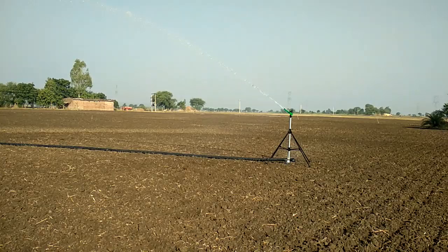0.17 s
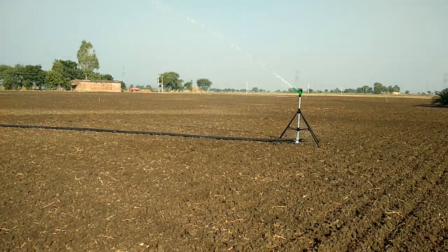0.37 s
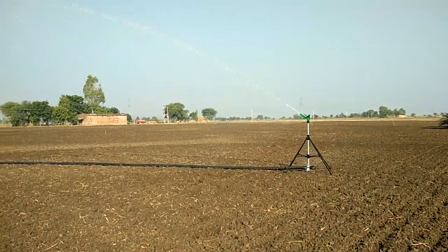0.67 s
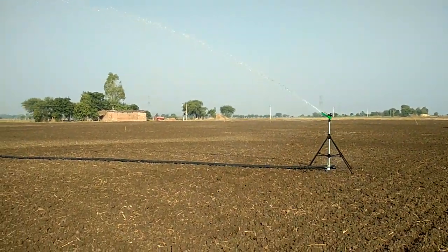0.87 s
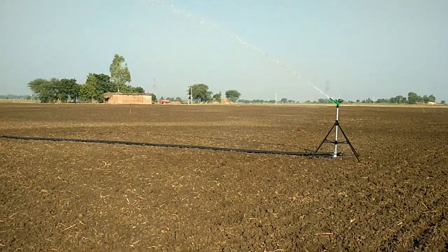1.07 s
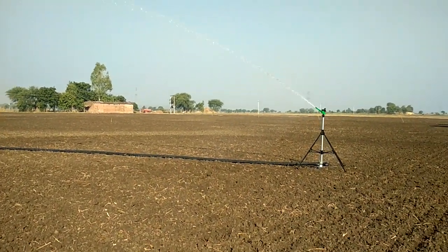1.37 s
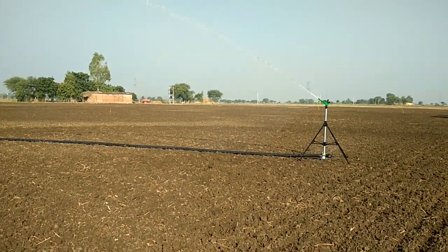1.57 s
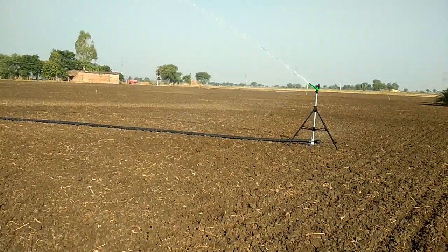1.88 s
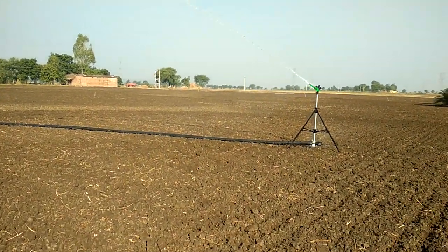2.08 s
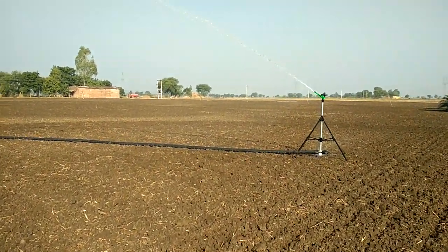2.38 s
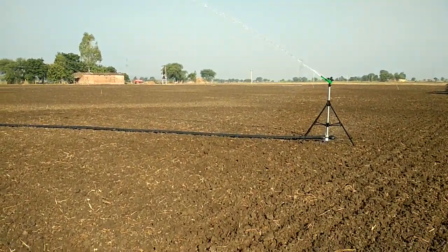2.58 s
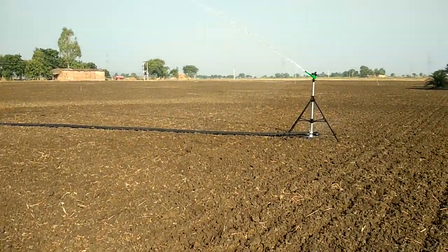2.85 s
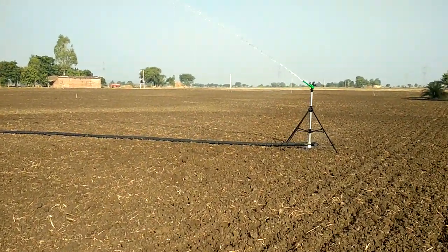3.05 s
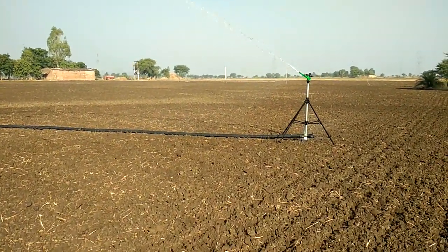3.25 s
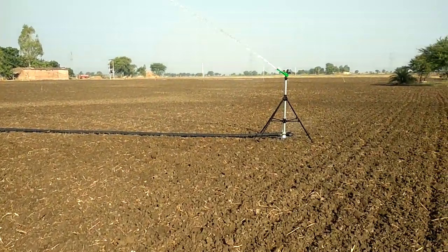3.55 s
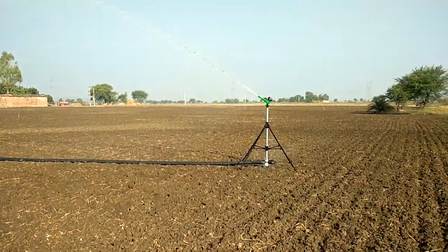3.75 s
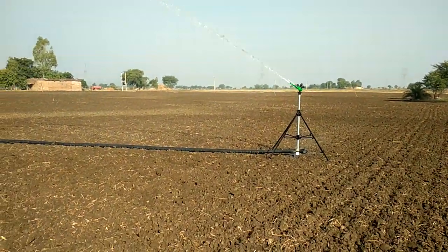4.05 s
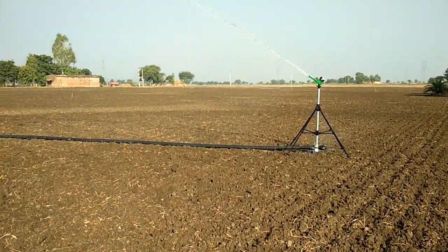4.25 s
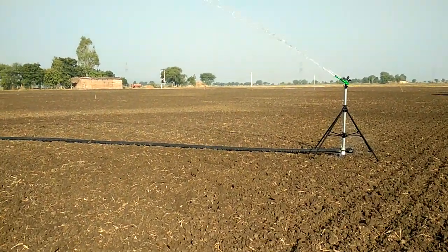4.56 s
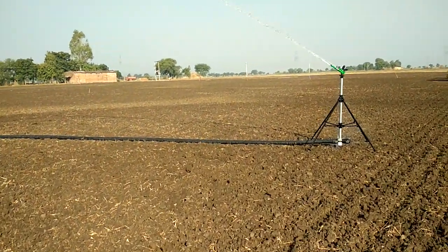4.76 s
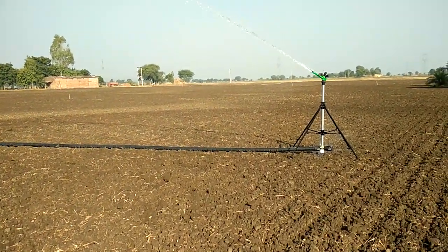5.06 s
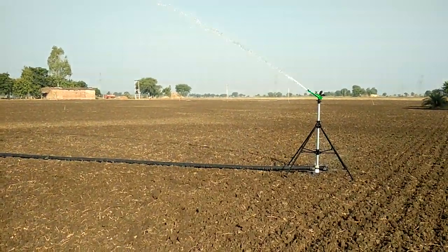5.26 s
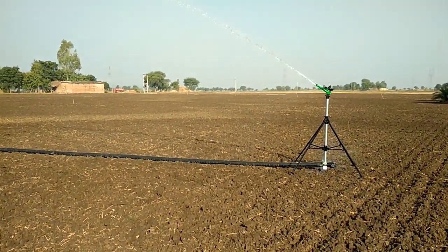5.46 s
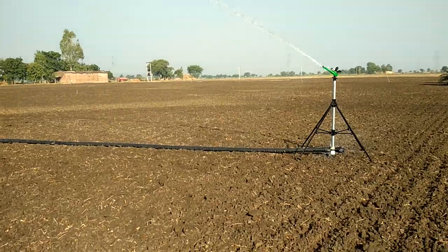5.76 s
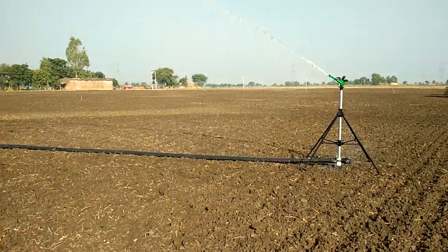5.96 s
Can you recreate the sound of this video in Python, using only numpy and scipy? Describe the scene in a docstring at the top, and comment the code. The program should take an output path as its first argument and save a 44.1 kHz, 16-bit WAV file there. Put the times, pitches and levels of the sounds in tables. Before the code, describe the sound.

An impact sprinkler clicks evenly, four times a second, a few metres off in an open field. Each stroke is a short metallic slap with a sharp, bright spurt of spray, mostly toward the right. A thin jet hiss continues beneath. Low wind rumble buffets the handheld phone microphone, strongest on the right and busier from three seconds on, with a pop near 3.8 seconds. Occasional dull footsteps scuff loose soil. No echo.

```python
"""An impact sprinkler on a tripod waters a ploughed field, some metres to the right of a hand-held phone.
About four times a second its spoon meets the jet, mostly with a ringing slap, and tears out bursts of spray.
The jet is a steady hiss of flickering noise bands, with a few short spits.
Wind noise buffets the two microphone ports, now and then with a pop; filtered grains make feet in loose soil.
A faint rumble of open country lies underneath."""
import sys
import numpy as np
from scipy import signal
from scipy.fft import rfft, irfft, next_fast_len
from scipy.io import wavfile
from scipy.ndimage import uniform_filter1d

SR = 44100
rng = np.random.default_rng(int(sys.argv[2]) if len(sys.argv) > 2 else 0)


def inscribe(sig):
    """Save sig as 16-bit PCM at rate SR to the path in sys.argv[1].

    A 1-D sig is mono; a 2-D sig holds one channel per row.
    Samples are clipped to [-1, 1] before scaling.
    """
    pcm = np.round(np.clip(np.atleast_2d(sig).T, -1, 1) * 32767)
    wavfile.write(sys.argv[1], SR, pcm.astype(np.int16))


N = 270333
TIME = np.arange(N) / SR  # seconds

# Strokes of the swing arm, and a second splash at 5.372. Each row: start in seconds, time in the jet in seconds,
# shredded water in dB, tint of the finest drops in dB, left minus right of the water in dB.
STROKES = [(.133, 0.016, -44.5, -9, -14), (0.384, 0.012, -47, -14, -18), (.631, 0.014, -53, 0, -8),
           (.88, 0.016, -47, -4, -5), (1.127, 0.016, -40, 6, -13), (1.375, 0.016, -37.5, 4, -15),
           (1.624, 0.015, -50.5, -2, -5), (1.869, 0.02, -52, -2, -3.5), (2.117, 0.017, -42, -16, -11),
           (2.364, 0.014, -47, -9, -11), (2.61, 0.01, -47.5, -9, -6.5), (2.857, 0.016, -38.5, 1.5, -10.5),
           (3.11, .014, -42.5, 3, -5.5), (3.354, 0.013, -38.5, 9.5, -11), (3.599, 0.015, -38, 6.5, -10.5),
           (3.848, 0.018, -41, 1.5, -14.5), (4.098, 0.013, -39, 5.5, -4.5),
           (4.344, 0.022, -36.5, 3.5, -8.5), (4.595, 0.0079, -36, -2.5, -12),
           (4.839, 0.013, -35.5, 1.5, -15), (5.083, 0.025, -39, 5, -11), (5.332, 0.02, -39, 2.5, -16),
           (5.372, 0.023, -39.5, 9, -30), (5.573, 0.02, -35.5, 5.5, -14.5), (5.818, 0.022, -42, 5, -2.5),
           (6.068, 0.012, -42, 14, -3.5)]
# Ringing modes of the spoon. Each row: nominal pitch in Hz, time to fade by 60 dB in seconds, relative level in dB.
SPOON_MODES = [(390, 0.062, -18.5), (783, 0.055, -10.5), (1213, 0.022, -1.5), (1298, 0.032, 5.5),
               (1410, 0.038, -5.5), (1596, 0.0095, 0.5), (1950, 0.01, -4), (2290, 0.025, -0.5),
               (3346, 0.015, -3.5)]
# Basic colour of shredded water. Each row: frequency in Hz, relative level in dB.
SPRAY_COLOUR = [(300, -37), (700, -20.5), (1400, -17), (2400, -13), (3400, -11), (4100, -11), (4700, -21.5),
                (5200, -9.5), (7000, -7.5), (8000, -3.5), (9200, 1), (11200, 0), (13000, -1.5),
                (15500, -9.5)]
# Shading of the left port by the body of the phone. Each row: frequency in Hz, relative level in dB.
LEFT_SHADE = [(500, 4), (1300, 10), (2000, 6.5), (4000, -4), (7000, 3), (10000, -7.5), (13000, -5),
              (15500, -36)]
# Colour of the free jet. Each row: frequency in Hz, relative level in dB.
JET_COLOUR = [(300, -28), (900, -12), (1400, -18), (2400, -9.5), (3400, -6.5), (4700, -11), (5600, -8.5),
              (7200, -7), (9500, 2), (11500, 1.2), (13500, -0.5), (15500, -8)]
# Hiss of the free jet at the right port. Each row: time in seconds, level in dB.
JET_LEVEL = [(0, -61.5), (1.8, -62), (2.3, -59.5), (2.9, -63), (3.8, -60), (4.7, -59), (5.3, -59),
             (6.1, -58.5)]
# Stray spits of water. Each row: time in seconds, level at the right port in dB, fading time in seconds.
SPITS = [(3.265, -48, 0.002), (4.523, -49.5, 0.0089)]
# Strength of the breeze on the right port. Each row: time in seconds, strength in dB.
BREEZE = [(0, -63), (.9, -70.5), (1.8, -74), (2.05, -55), (2.45, -53), (2.88, -70), (3.15, -42),
          (3.45, -38), (3.8, -33.5), (4, -51.5), (4.6, -63), (5.2, -61), (5.95, -45), (6.12, -31)]
# Short wind rumbles: gusts on the right port, air stirred on the left as steps sway the phone.
# Each row: time of the peak in seconds, peak strength in dB, port that rumbles.
WIND_RUMBLES = [(.06, -44, "left"), (.5, -53, "right"), (1.19, -54, "right"), (2.21, -51, "left"),
                (2.22, -55, "right"), (2.66, -51, "left"), (2.73, -42.5, "right"), (2.98, -48, "right"),
                (3.31, -36, "right"), (4.17, -47, "left"), (4.19, -42, "right"), (4.371, -37, "right"),
                (4.42, -48.5, "left"), (4.823, -35.5, "right"), (5.08, -51, "right"), (5.1, -44.5, "left"),
                (5.351, -38, "right"), (5.51, -37.5, "right"), (5.691, -36, "right"),
                (5.85, -35.5, "right")]
# Colour of the big eddies at a port. Each row: frequency in Hz, relative level in dB.
EDDY_COLOUR = [(10, -0.5), (25, 5.5), (55, -5.5), (85, -8.5), (120, -12.5), (160, -30), (220, -32.5),
               (400, -45.5), (900, -77), (2500, -81)]
# Colour of small eddies torn off the edge of a port. Each row: frequency in Hz, relative level in dB.
FLUTTER_COLOUR = [(60, -13), (130, 5), (250, -7.5), (450, -12.5), (900, -24), (2500, -45)]
# Wind pops in the right port. Each row: time in seconds, peak pressure ahead of the low-pass in dB.
POPS = [(3.821, -25.5), (5.657, -41.5)]
# Dull scuffs of feet in the soil. Each row: start in seconds, relative level in dB, centre pitch in Hz,
# fading time in seconds.
SCUFFS = [(.002, -58.5, 533, 0.072), (.116, -55, 340, 0.024), (1.064, -51.5, 540, .011),
          (1.327, -63, 496, .014), (2.042, -64.5, 294, 0.032), (2.172, -46.5, 262, 0.033),
          (2.209, -44, 290, .02), (4.441, -35, 370, 0.013), (4.831, -51.5, 215, 0.0096),
          (5.21, -60.5, 390, 0.037), (5.259, -59, 760, 0.076), (5.3, -52, 410, 0.036)]
# Hollow tone that all scuffs share. Each row: frequency in Hz, relative level in dB.
HOLLOW_TONE = [(120, 5), (200, -4.5), (325, 3), (360, -.5), (410, 1), (500, -3), (620, 1), (900, -1)]
# Jolts of the phone as a shoe comes down. Each row: start in seconds, level in dB, pitch in Hz.
JOLTS = [(0.044, -52.5, 101), (2.175, -48, 91), (2.211, -39.5, 112)]
# Colour of the still countryside. Each row: frequency in Hz, relative level in dB.
FIELD_COLOUR = [(30, 2.5), (110, 0), (200, -15.5), (400, -11), (700, -20.5), (1500, -21), (4000, -19),
                (12000, -35)]

MID_SIDE = np.array([[1], [-1]])  # sign of the side sound at the left and right port


def sprinkler(lead_s=0.03, drift_s=0.03, slap_left_db=-6, slap_apart=0.29, ragged_db=1.4, shared=0.087):
    """Most strokes slap; each tears the jet and leaves a fading fan of spray."""
    out = np.zeros((2, N))
    t = np.arange(int(0.26 * SR)) / SR - lead_s
    lag_s = 0.0002  # the sound reaches the right port first
    for s, dwell, shred_db, fine_db, pan_db in STROKES:
        hardness_db = shred_db + 42  # against a stroke of middling strength
        # a harder stroke tears the water finer; a wide spread of sizes lifts finest and coarsest alike
        coarse_db = 1.07 - 0.55 * hardness_db + 0.09 * fine_db
        # hard strokes throw more drifting spray
        drift_db = shred_db - 1.5 + 0.11 * hardness_db
        fan = undb(drift_db + ragged_db * walk(264, len(t))) * swell(t - dwell, 0.0085, drift_s)
        # the spoon bites ever more gradually as the head turns
        build = 0.12 + 0.083 * s
        strength = np.hypot(undb(shred_db) * shred(t, dwell, build), fan)
        # the wide fan of water sounds partly unlike at the two ports
        right, other = (splash(len(t), coarse_db, fine_db) for _ in range(2))
        left = colour(shared * right + np.sqrt(1 - shared ** 2) * other, LEFT_SHADE)
        knock, stray = (undb(slap_level(s)) * slap(t, dwell) for _ in range(2))
        left_knock = undb(slap_left_db) * (knock + slap_apart * stray)
        add(out[0], s - lead_s + lag_s, undb(pan_db) * strength * left + left_knock)
        add(out[1], s - lead_s, strength * right + knock)
    return out


def slap_level(s, start_db=-53.5, growth_db_per_s=0.84, faint_db=-23):
    """Level in dB of a slap at s seconds: it grows as the head turns and the phone comes nearer."""
    faint = 5.352 < s < 5.7  # here the water bursts with hardly any slap
    return start_db + growth_db_per_s * s + faint_db * faint


def slap(t, dwell, blow=0.42, push_s=0.0065, rest=0.15):
    """One blow as the spoon meets the jet, then water hammers on it; both ring its short modes."""
    age = t - t[0]
    force = swell(t - 0.002, 0.003, push_s) + rest * swell(t - dwell, 0.015, 0.027)
    force = force / np.sqrt(np.sum(force ** 2))
    sound = 0
    for hz, t60, db in SPOON_MODES:
        pitch = hz * (1 + 0.0083 * rng.standard_normal())
        ring = np.sin(2 * np.pi * pitch * age) * np.exp(-np.log(1000) * age / t60)
        drive = force * rng.standard_normal(len(t))
        drive[np.searchsorted(t, 0)] += blow * rng.choice([-1, 1])
        sound = sound + undb(db) * unit(signal.fftconvolve(drive, ring)[:len(t)])
    in_jet = (t > 0) & (t < dwell)
    return sound / np.sqrt(np.mean(sound[in_jet] ** 2))


def shred(t, dwell, build, entry=0.25, snap=0.27, graze=0.15, graze_s=0.0047, flutter_db=3.0):
    """Strength of the spray: the spoon grazes the jet, tears it ever harder, and spits as it snaps out."""
    depth = 1 - build * (1 - np.clip(t / dwell, 0, 1))
    leaving = swell(np.maximum(t - dwell, 0), 1, 0.005)
    inside = depth * swell(t - 0.001, 0.0038, 0.71) * leaving
    entry_spit = depth * entry * swell(t - 0.001, 0.00078, 0.00053)
    exit_spit = snap * swell(t - dwell, 0.0012, 0.0016)
    strength = inside + entry_spit + exit_spit + graze * swell(t, graze_s, graze_s)
    strength = strength * undb(flutter_db * np.minimum(walk(600, len(t)), 1))
    torn = (t > 0) & (t < dwell + 0.006)
    return strength / np.sqrt(np.mean(strength[torn] ** 2))


def splash(size, coarse_db, fine_db, patchy_db=3.0):
    """Sound of torn water: its drop sizes set the colour, a little uneven and new every time."""
    hz = np.linspace(1500, 16000, 44)
    # coarse drops fill the middle, the finest drops the top
    tint = np.interp(hz, [1500, 3000, 6500, 9000, 11500, 13500], [0, coarse_db, coarse_db, 0, 0, fine_db])
    uneven = patchy_db * rng.standard_normal(len(hz))
    water = colour(droplets(size, spread_db=0.5), SPRAY_COLOUR)
    return unit(colour(water, np.column_stack([hz, tint + uneven])))


def droplets(size, spread_db):
    """A dense stream of tiny bursts of unequal strength: noise with a fast random level."""
    return rng.standard_normal(size) * undb(spread_db * walk(4000, size))


def jet(left_db=-10.0, restless_db=2.63):
    """The free jet breaks up in the air: each band of its hiss comes and goes on its own."""
    out = 0
    edges = np.geomspace(500, 16000, 13)  # Hz
    for lo, hi in zip(edges, edges[1:]):
        bandpass = signal.butter(3, [lo, hi], "band", fs=SR, output="sos")
        band = signal.sosfilt(bandpass, [droplets(N, spread_db=2.5) for _ in range(2)])
        out = out + band * undb(restless_db * walk(22.03, N))
    hiss = np.array([unit(colour(port, JET_COLOUR)) for port in out])
    return hiss * undb(curve(JET_LEVEL)) * undb([[left_db], [0]])


def spits(left_db=-10):
    """The jet sputters briefly: short bursts of splash noise."""
    out = np.zeros((2, N))
    for s, db, fade_s in SPITS:
        burst = undb(db) * swell(TIME - s, 0.001, fade_s) * splash(N, 0, 0)
        out += burst * undb([[left_db], [0]])
    return out


def wind(lee_db=-31, calm_db=-70.5, rise_s=0.037, fall_s=0.045):
    """Each port has its own eddies, driven by the breeze and by its own short rumbles."""
    breeze = undb(curve(BREEZE))
    # the sheltered left port gets a small share of the breeze, over a stirring that never stops
    push = {"left": np.hypot(undb(lee_db) * breeze, undb(calm_db)), "right": breeze}
    for s, db, port in WIND_RUMBLES:
        push[port] = np.hypot(push[port], undb(db) * swell(TIME - s, rise_s, fall_s))
    return np.array([port_wind(push["left"]), port_wind(push["right"])])


def port_wind(push, buffet_db=5.5, flutter_db=-25, lumpy_db=7):
    """Big eddies push on a port, with brief lulls; small ones flutter in short fits."""
    eddies = even(colour(rng.standard_normal(N), EDDY_COLOUR), span_s=0.073)
    eddies = eddies * undb(buffet_db * np.clip(walk(35, N), -3, 1))
    flutter = colour(rng.standard_normal(N), FLUTTER_COLOUR)
    flutter = unit(flutter * undb(lumpy_db * np.clip(walk(45, N), -2, 2)))
    return (eddies + undb(flutter_db) * flutter) * push


def pops(build_s=0.00066, collapse_s=0.00018, dull_hz=1500):
    """Pressure builds up in the right port and quickly collapses, dulled by a low-pass."""
    push = sum(undb(db) * swell(TIME - s, build_s, collapse_s) for s, db in POPS)
    lowpass = signal.butter(4, dull_hz, fs=SR, output="sos")
    return np.array([np.zeros(N), signal.sosfilt(lowpass, push)])


def feet(gain_db=-5, low_edge=0.71, high_edge=1.35, grit_db=-25, crumble_db=-20, crumble_s=0.054,
         clods_db=1.7, apart_db=-10, pan_db=2.5):
    """Soft clods give way under a shoe: a dull grainy thud, then a little crumbling."""
    out = np.zeros((2, N))
    t = np.arange(int(0.3 * SR)) / SR - 0.05
    f = np.geomspace(40, 6000, 40)  # Hz
    pan = np.array([[pan_db], [-pan_db]]) / 2  # pan_db is left minus right
    for s, level_db, hz, fade_s in SCUFFS:
        thud = 1 / np.sqrt(1 + (f / (high_edge * hz)) ** 10)
        grit = undb(grit_db) / np.sqrt(1 + (f / 1150) ** 6)
        low_cut = np.sqrt(1 + (low_edge * hz / f) ** 6)
        body = np.column_stack([f, 20 * np.log10((thud + grit) / low_cut)])
        mid, side = (scuff_grains(len(t), body) for _ in range(2))
        pair = (mid + undb(apart_db) * side * MID_SIDE) * undb(clods_db * walk(128, len(t)))
        strength = swell(t - 0.005, 0.0061, fade_s) + undb(crumble_db) * swell(t, 0.0058, crumble_s)
        add(out, s + t[0], pair * strength * undb(level_db + gain_db + pan))
    return out


def scuff_grains(size, body):
    """Soil grains: uneven noise with the body of one scuff and the hollow tone, held at an even level."""
    grains = colour(droplets(size, spread_db=6.0), body)
    return even(colour(grains, HOLLOW_TONE), span_s=0.022)


def jolts(fade_s=0.011):
    """A low, quickly damped sine bump that both ports feel alike."""
    out = np.zeros(N)
    for s, db, hz in JOLTS:
        bump = np.sin(2 * np.pi * hz * (TIME - s))
        out += undb(db) * bump * swell(TIME - s - 0.003, 0.003, fade_s)
    return out


def field(level_db=-73, side_db=-5):
    """Faint far rumble of the open country: coloured noise, wide and slowly wandering in level."""
    mid, side = (unit(colour(rng.standard_normal(N), FIELD_COLOUR)) for _ in range(2))
    return undb(level_db + 0.73 * walk(4.3, N)) * (mid + undb(side_db) * side * MID_SIDE)


def undb(db):
    """Decibels to gain."""
    return 10 ** (np.asarray(db) / 20)


def unit(x):
    """Scale to rms 1."""
    return x / np.sqrt(np.mean(x ** 2))


def even(x, span_s):
    """Hold the rms of a noise near 1 over every span."""
    return x / np.sqrt(uniform_filter1d(x ** 2, max(int(span_s * SR), 2)) + 1e-12)


def curve(rows):
    """Join (seconds, value) rows by straight lines."""
    return np.interp(TIME, *np.transpose(rows))


def colour(x, points):
    """Shape a sound by (Hz, dB) points, joined along a logarithmic frequency axis."""
    hz, db = np.transpose(points)
    size = next_fast_len(len(x))
    f = np.maximum(np.fft.rfftfreq(size, 1 / SR), 1)
    gain = undb(np.interp(np.log(f), np.log(hz), db))
    return irfft(rfft(x, size) * gain, size)[:len(x)]


def walk(rate, size):
    """Smooth random wander with a spread near 1, drawing new values at rate in Hz."""
    k = max(int(SR / rate), 1)
    held = np.repeat(rng.standard_normal(size // k + 1), k)
    return 1.43 * uniform_filter1d(uniform_filter1d(held, k), k)[:size]


def swell(t, rise, fall):
    """Exponential rise up to t = 0, exponential fall after it."""
    return np.exp(np.minimum(t, 0) / rise - np.maximum(t, 0) / fall)


def add(track, s, sound):
    """Mix a sound in from s seconds, trimmed to the track."""
    start = int(s * SR)
    lo, hi = max(start, 0), min(start + sound.shape[-1], N)
    track[..., lo:hi] += sound[..., lo - start:hi - start]


def scene():
    """Sum of all sources in the open air: nothing reflects."""
    return sprinkler() + jet() + spits() + wind() + pops() + feet() + jolts() + field()


def record(dry, top_hz=15850):
    """The phone cuts the top with a steep low-pass."""
    return signal.sosfilt(signal.ellip(10, 0.2, 70, top_hz, fs=SR, output="sos"), dry)


dry = scene()
out = record(dry)
inscribe(out)
```